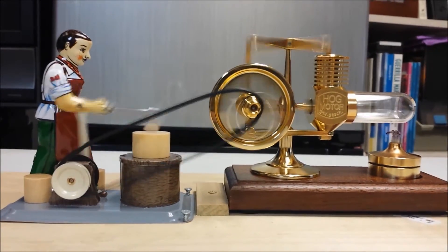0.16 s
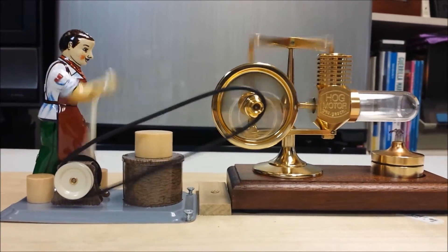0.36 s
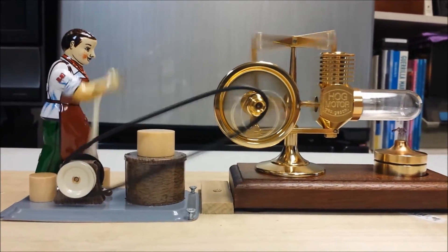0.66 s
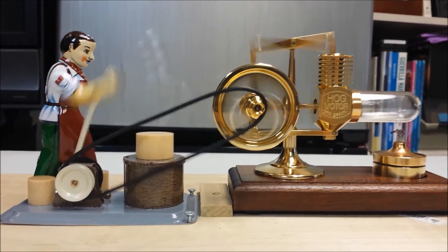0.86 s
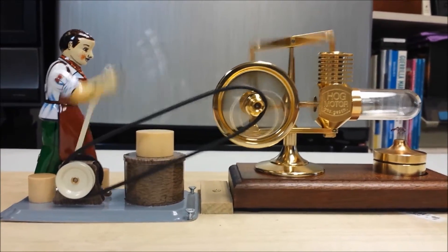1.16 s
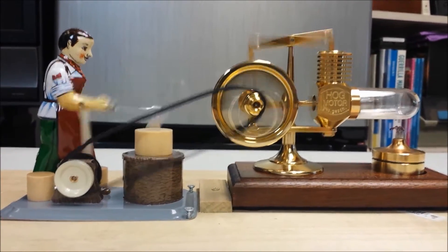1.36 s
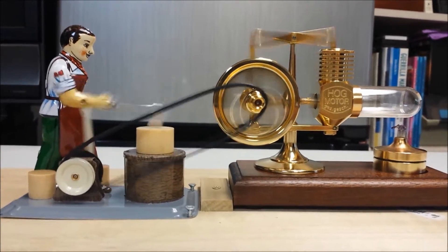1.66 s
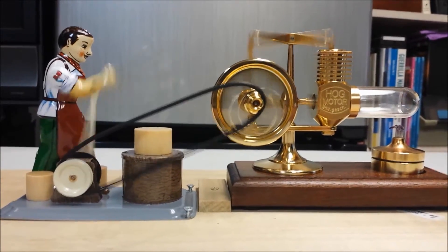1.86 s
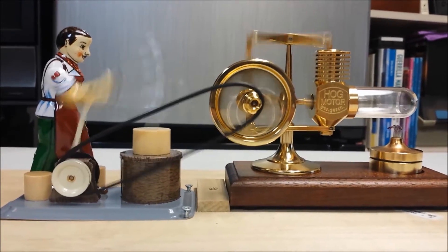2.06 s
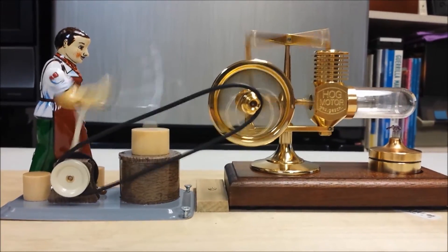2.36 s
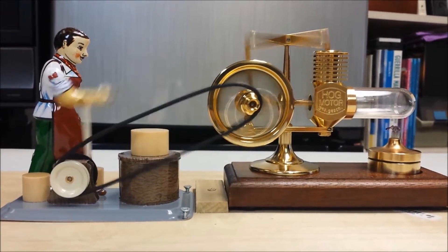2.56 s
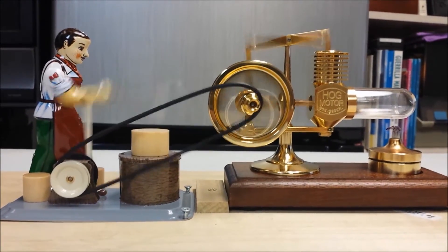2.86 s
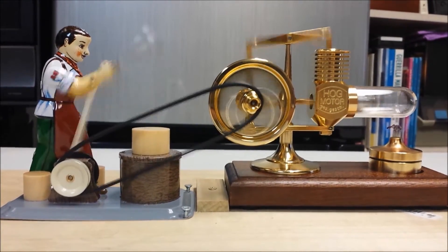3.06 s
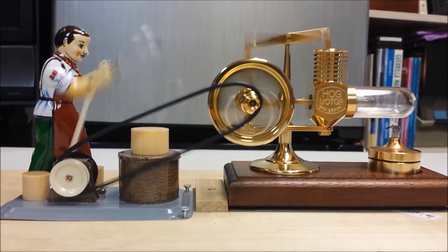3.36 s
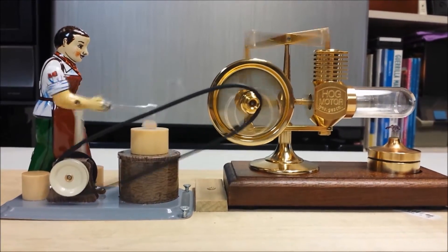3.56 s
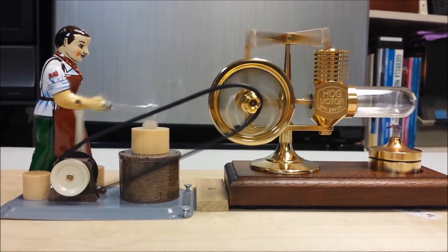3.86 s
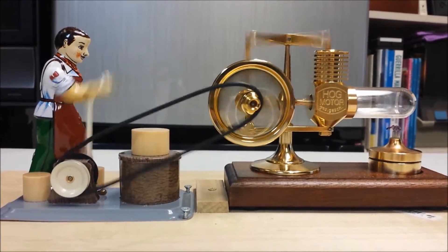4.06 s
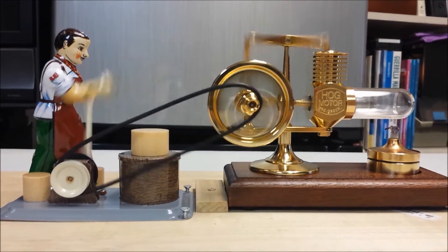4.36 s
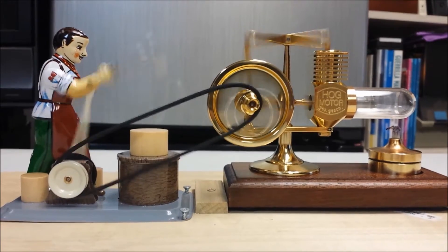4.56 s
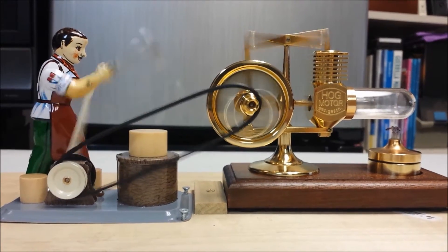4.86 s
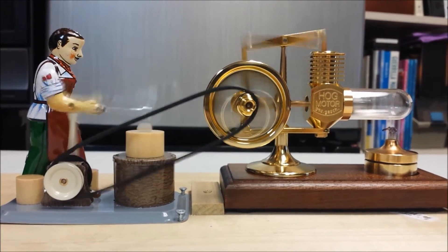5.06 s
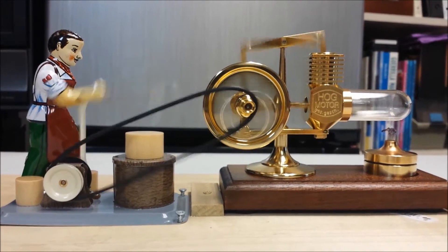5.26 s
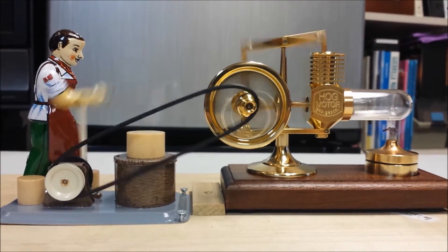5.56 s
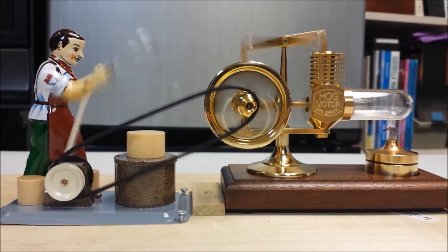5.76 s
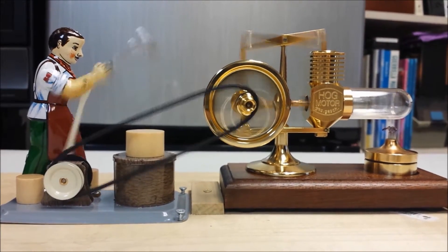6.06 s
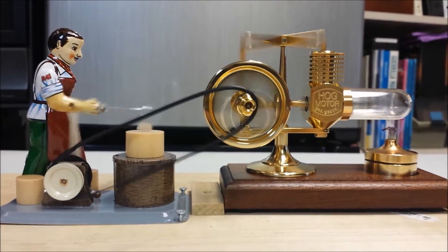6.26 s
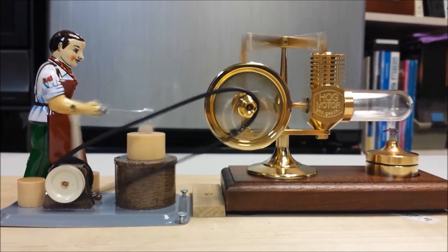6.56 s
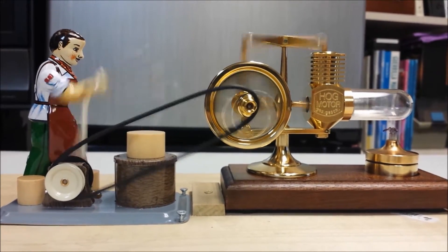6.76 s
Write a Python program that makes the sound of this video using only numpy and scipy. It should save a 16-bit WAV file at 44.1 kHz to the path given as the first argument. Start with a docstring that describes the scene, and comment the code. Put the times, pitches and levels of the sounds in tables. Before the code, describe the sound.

Steady, fast mechanical clacking, running from start to end without a pause. A tin linkage rattles and its edges squeak just before every blow; the axe cracks dryly on the block with a short hollow knock around 1 kHz, bounces once and chatters out. Behind it lies a quiet low engine rumble with fine rod ticks. Heard closely in stereo, the metal brighter on the right, with near echoes in a small room.

```python
"""A desk in a small room: a hot-air engine drives a tin toy woodcutter by a thin belt, close to two microphones.
Before each blow the toy's linkage rattles and its tin edges squeak, as clumped contacts through thin metal.
The axe knocks on the block (decaying sines) with a metallic crack (noise), bounces once and chatters to rest.
Behind it the engine hums through its base (shaft orders over rumbling noise) and its rods tick;
the room adds near echoes and a short diffuse tail."""
import sys
import numpy as np
from scipy import signal
from scipy.fft import rfft, irfft, next_fast_len
from scipy.io import wavfile
from scipy.ndimage import uniform_filter1d

SR = 44100
rng = np.random.default_rng(int(sys.argv[2]) if len(sys.argv) > 2 else 0)


def wrap_up_sound(samples):
    """Save the sound to the file named by the first command line argument, as 16-bit audio."""
    columns = np.atleast_2d(samples).T
    # keep every value between -1 and 1, then stretch to whole-number steps
    tamed = np.clip(columns, -1, 1)
    steps = np.round(tamed * 32767).astype(np.int16)
    wavfile.write(sys.argv[1], SR, steps)


N = 304819

# Axe strokes: (time [s], relative level of the blow [dB], relative level of the rattle before it [dB])
STROKES = [(0.1338, -18, -29), (0.2781, -17, -26), (0.4246, -17, -23.5), (0.5733, -17, -23),
           (0.7204, -16.5, -21.0), (0.8881, -17.5, -30.5), (1.0297, -17, -24.5), (1.1763, -16.5, -20.5),
           (1.3306, -17.5, -23), (1.4783, -17.0, -25.5), (1.6339, -17.5, -22), (1.777, -16, -21),
           (1.92, -17.5, -21.5), (2.0697, -15.5, -21), (2.2181, -18.0, -23.5), (2.3667, -20, -24.5),
           (2.5125, -18.5, -22.5), (2.6559, -17, -23), (2.803, -17, -26), (2.9507, -15.5, -24),
           (3.095, -15.5, -20.0), (3.247, -17.5, -19.5), (3.3933, -15, -22.5), (3.541, -17.0, -22),
           (3.6918, -17.5, -27), (3.8366, -17, -25.5), (3.994, -17.5, -23.5), (4.1406, -16.5, -25.5),
           (4.2879, -17.0, -21.5), (4.4374, -16, -23), (4.5845, -15.5, -21.5), (4.7644, -18, -22.5),
           (4.9115, -16, -26), (5.0541, -17.5, -22.5), (5.201, -17.5, -26), (5.3435, -17.0, -24),
           (5.513, -17.0, -27), (5.656, -17, -22.5), (5.8004, -18.5, -23.5), (5.9468, -18.0, -24.5),
           (6.0915, -17.5, -23.5), (6.253, -16.5, -32.5), (6.3928, -18.5, -23), (6.5376, -17.0, -23.5),
           (6.6898, -18.5, -24.5), (6.8371, -15.5, -22.5)]
# Modes of the block on its tin plate: (frequency [Hz], relative level [dB], t60 [s], rise constant [s])
BLOCK_MODES = [(292, -22, 0.13, 0.004), (358, -24, 0.14, 0.004), (490, -12, 0.11, 0.012),
               (510, -10.2, 0.18, 0.0119), (532, -26.1, 0.119, 0.0002), (815, -23, 0.127, 0.0013),
               (986, -14.8, 0.119, 0.012), (1028, 4.7, 0.044, 0.0012), (1013, -12.8, 0.182, 0.0057),
               (1077, -2.3, 0.052, 0.0008), (1185, -10.5, 0.06, 0.0008), (1255, -21.2, 0.085, 0.0007),
               (1382, 0.5, 0.016, 0.0033), (1892, -0.0, 0.01, 0.0007), (2110, -8, 0.03, 0.001),
               (2200, -17, 0.079, 0.0027)]
# Echoes of the knock from near surfaces: (delay [s], level against the knock [dB])
NEAR_ECHOES = [(0.00623, -14.8), (0.01111, -14.7), (0.02791, -24.5)]
# Single hard clicks: catches of loose tin parts, and at 3.131 s a bounce of the axe:
# (time [s], relative level [dB])
HARD_CLICKS = [(0.0907, -18), (0.5212, -13), (1.4277, -9.5), (1.5755, -8.5), (2.7517, -12.5), (3.131, -4),
               (3.486, -10), (3.7853, -20), (4.0901, -19), (5.468, -16)]
# Ringing of the thin metal: (frequency [Hz], width [Hz], height over the broad colour at ring 1 [dB])
TIN_RESONANCES = [(510, 30, 3), (1005, 60, 4), (1270, 80, 5), (1950, 60, 2), (2100, 40, 2), (2210, 50, 4),
                  (3460, 70, 2), (4545, 100, 4), (4880, 90, 6), (5680, 110, 3), (6070, 70, 8),
                  (6680, 45, 4), (7850, 90, 5.5), (8680, 70, 4), (10950, 120, 4), (12780, 110, 7)]
# Broad colour of the axe's crack, also of the gritty clicks: (frequency [Hz], relative level [dB])
CRACK_COLOUR = [(60, -32), (180, -11), (700, -18), (1500, -3.5), (2700, -5.5), (3800, 1.5), (6000, 1.5),
                (7300, 3), (9200, 3.5), (11500, -3.5), (13300, -7.5), (14400, -12), (15500, -27)]
# Broad colour of the swinging linkage: (frequency [Hz], relative level [dB])
RATTLE_COLOUR = [(60, -30), (130, -7), (380, 2), (520, 0), (700, -8), (900, -6.5), (1300, -2), (2000, 1.5),
                 (2900, -1), (4100, 4), (6000, 2), (9000, 1.5), (12000, -9), (15000, -16)]
# Broad colour of the chatter, the bounce and the engine ticks: (frequency [Hz], relative level [dB])
CLATTER_COLOUR = [(70, -17.5), (300, -6.5), (800, -4.5), (1400, 0.5), (2800, -1), (4800, 0), (7000, -1),
                  (10000, -6), (12500, -13), (15000, -29)]
# Broad colour of the engine's rumble: (frequency [Hz], relative level [dB])
RUMBLE_COLOUR = [(20, -23), (55, -15), (85, -10.5), (115, 3), (150, -6.5), (190, 3), (250, -15.5),
                 (290, -1), (335, -10), (365, 3), (420, -41), (520, -3.5), (750, -30), (2000, -50.5)]
# Speed of the engine shaft: (time [s], rate [turns/s])
SHAFT_SPEED = [(0, 20.3), (.75, 19), (1.25, 19.35), (1.748, 19.46), (3.252, 19.52), (5, 20), (6.902, 15.6)]
# Engine hum in the base: (shaft order [multiple of the turning rate], relative level [dB])
HUM_ORDERS = [(4, -65), (5, -65), (6, -66), (8, -60), (9, -53), (10, -57), (11, -65), (12, -53), (13, -65),
              (15, -64), (16, -64), (24, -66)]
# Decay of the room tail: (frequency [Hz], t60 [s])
ROOM_DECAY = [(150, 0.16), (1000, 0.15), (5000, 0.13), (14000, 0.14)]
# Colour difference of the microphones: (frequency [Hz], left minus right [dB])
MIC_BALANCE = [(60, -4), (110, -1), (200, 3.5), (380, 0.5), (700, -1.5), (2400, -0.5), (4400, -1),
               (6300, 0.5), (8100, -5.5), (11000, -8), (15000, -3)]
# Treble roll-off of the whole sound: (frequency [Hz], level [dB])
TREBLE_ROLLOFF = [(14500, 0), (15100, -15), (16400, -24)]

# The axe's bounce: time in the air and its scatter, scatter of strength, level at which it rings the block
BOUNCE_S, BOUNCE_VARY_S, BOUNCE_VARY_DB, BOUNCE_KNOCK_DB = 0.0272, 0.0011, 2.6, -22
# The swing's rattle starts ahead of the blow, swells, holds and dies away
SWING_LEAD_S, SWING_RISE_S, SWING_HOLD_S, SWING_FALL_DB_PER_S = 0.059, 0.0077, 0.02, 720
# No two swings are alike: scatter of the start and of the hold
SWING_START_VARY_S, SWING_HOLD_VARY_S = 0.0013, 0.0034
# A soft swell of rattle leads into each blow: lead, half-length, level against the blow
LEAD_IN_S, LEAD_IN_HALF_S, LEAD_IN_DB = 0.0021, 0.0019, -13
# The chatter after the blow dies at a steady pace; its strength scatters
CHATTER_FALL_DB_PER_S, CHATTER_VARY_DB = 284, 0.7
# Two weaker catches in each swing: lead before the blow and its scatter, level and its scatter
CATCH_LEAD_S, CATCH_VARY_S, CATCH_DB, CATCH_VARY_DB = 0.053, 0.011, -21, 2.5
# Pitch of every squeak and its scatter
SQUEAK_HZ, SQUEAK_VARY_OCTAVES = 9560, 0.23
BASS_EDGE_HZ = 103  # such small parts radiate little below this
EXTRA_PATH_S = 0.000185  # later arrival of the near sound at the left microphone
TOP_HZ = 16450  # band limit of the whole sound


def amp(db):
    """Decibels to amplitude gain."""
    return 10 ** (np.asarray(db) / 20)


def unit(x):
    """Scale x to rms 1."""
    return x / np.sqrt(np.mean(x ** 2) + 1e-20)


def along(points, hz):
    """Read (frequency [Hz], value) points on a log frequency axis."""
    f, value = np.transpose(points)
    return np.interp(np.log(hz + 1), np.log(f), value)


def filtered(x, response):
    """Multiply the spectrum of x by a response given as a function of frequency in Hz."""
    size = next_fast_len(N + SR // 2)
    hz = np.fft.rfftfreq(size, 1 / SR)
    return irfft(rfft(x, size) * response(hz), size)[..., :N]


def add(track, s, sound):
    """Mix a sound into the track at time s, cut at the track's end."""
    start = max(round(s * SR), 0)
    target = track[..., start:start + sound.shape[-1]]
    target += sound[..., :target.shape[-1]]


def spread(make, apart):
    """A left-right pair of rms 1: one shared signal plus a share of each side's own."""
    shared = make()
    own = np.array([make(), make()])
    return unit(shared + apart * own)


def contacts(rate, scatter_db, apart):
    """Dense tiny impacts of random sign and uneven size, on average rate a second in each part of the pair."""
    def impacts():
        struck = rng.random(N) < rate / SR
        sign = rng.choice([-1, 1], N)
        return struck * sign * amp(scatter_db * rng.standard_normal(N))
    return spread(impacts, apart)


def tin(x, colour, ring, size=8192):
    """Contacts heard through thin metal: a minimum-phase filter of energy 1 with its resonances."""
    hz = np.fft.rfftfreq(size, 1 / SR)
    peaks = sum((amp(db) ** 2 - 1) / (1 + (2 * (hz - f) / width) ** 2) for f, width, db in TIN_RESONANCES)
    magnitude = amp(along(colour, hz)) * np.sqrt(1 + np.abs(ring * peaks))
    # folding the cepstrum onto positive times makes the filter causal
    cepstrum = irfft(np.log(magnitude))
    cepstrum[1:size // 2] *= 2
    cepstrum[size // 2 + 1:] = 0
    answer = irfft(np.exp(rfft(cepstrum)))
    answer = answer / np.linalg.norm(answer)
    return signal.fftconvolve(x, answer[None], axes=1)[:, :N]


def second_landings():
    """Where each bounce of the axe ends, as (time [s], level [dB]), scattered in time and strength."""
    chance = rng.standard_normal((len(STROKES), 2))
    return [(s + BOUNCE_S + BOUNCE_VARY_S * late, blow_db + BOUNCE_VARY_DB * hard)
            for (s, blow_db, _), (late, hard) in zip(STROKES, chance)]


def knocks(landings, level_db, vary_db):
    """The axe rings the block's decaying modes, unevenly, and faintly again on the bounce; blows echo nearby."""
    out, t = np.zeros(N), np.arange(SR // 4) / SR
    hz, db, t60, rise = np.transpose(BLOCK_MODES)[:, :, None]
    for (s, blow_db, _), (landing_s, landing_db) in zip(STROKES, landings):
        strength = db + vary_db * rng.standard_normal(db.shape)
        envelope = amp(strength - 60 * t / t60) * (1 - np.exp(-t / rise))
        knock = (envelope * np.sin(2 * np.pi * hz * t)).sum(0)
        for delay, echo_db in [(0, 0), *NEAR_ECHOES]:
            add(out, s + delay, amp(blow_db + level_db + echo_db) * knock)
        add(out, landing_s, amp(landing_db + level_db + BOUNCE_KNOCK_DB) * knock)
    return np.array([out, out])


def cracks(level_db, t60, fresh, apart, ring, linger):
    """Metal meets the block: brief bursts of scattered contacts, partly alike from blow to blow."""
    out, t = np.zeros((2, N)), np.arange(SR // 25) / SR

    def scatter():
        return spread(lambda: rng.uniform(-0.87, 1, len(t)), apart)

    usual = scatter() * amp(-60 * t / 0.025)  # the shared part has its own 25 ms decay
    for s, blow_db, _ in STROKES:
        # the axe grinds on the block for a moment before the sound dies
        grind_s = linger * rng.uniform(0.14, 1.0)
        fade_db = -60 * np.maximum(t - grind_s, 0) / t60
        mix = (usual + fresh * scatter()) / np.hypot(1, fresh)
        add(out, s, amp(blow_db + level_db) * mix * amp(fade_db))
    return tin(out, CRACK_COLOUR, ring)


def bounces(landings, level_db, t60, ring):
    """The second landing of the axe is a short dry click of decaying noise through tin."""
    out, t = np.zeros((2, N)), np.arange(SR // 60) / SR
    for s, db in landings:
        grit = spread(lambda: rng.uniform(-1.05, 1, len(t)), apart=0.67)
        add(out, s, amp(db + level_db - 60 * t / t60) * grit)
    return tin(out, CLATTER_COLOUR, ring)


def linkage(swing_db, settle_db, lumpy_db, ring):
    """The loose arm rattles as it is swung, swells softly into the blow, and chatters after it."""
    swing, settle, t = np.zeros(N), np.zeros(N), np.arange(SR // 10) / SR
    swell = np.minimum(t / SWING_RISE_S, 1) ** 2
    lead_in = np.exp(-(t / LEAD_IN_HALF_S - 2) ** 2)
    chance = rng.standard_normal((len(STROKES), 3))
    for (s, blow_db, rattle_db), (late, longer, harder) in zip(STROKES, chance):
        hold_end = SWING_RISE_S + SWING_HOLD_S + SWING_HOLD_VARY_S * longer
        fall_db = SWING_FALL_DB_PER_S * np.maximum(t - hold_end, 0)
        swing_start = s - SWING_LEAD_S + SWING_START_VARY_S * late
        add(swing, swing_start, swell * amp(rattle_db + swing_db - fall_db))
        add(swing, s - LEAD_IN_S - 2 * LEAD_IN_HALF_S, amp(blow_db + LEAD_IN_DB) * lead_in)
        chatter_db = blow_db + settle_db + CHATTER_VARY_DB * harder
        add(settle, s, amp(chatter_db - CHATTER_FALL_DB_PER_S * t))
    # the impacts come in clumps of a few milliseconds
    lumps = unit(uniform_filter1d(rng.standard_normal(N), size=170))
    clumps = unit(amp(lumpy_db * lumps))
    swing_hits = swing * clumps * contacts(rate=7000, scatter_db=5.0, apart=0.94)
    rattle = tin(swing_hits, RATTLE_COLOUR, ring)
    settle_hits = settle * clumps * contacts(rate=6000, scatter_db=1.5, apart=1.0)
    return rattle + tin(settle_hits, CLATTER_COLOUR, ring)


def squeaks_and_clicks(level_db, width, body_db, t60, ring):
    """Catching tin edges, and one hard bounce: a tiny bright windowed sine and a gritty noise click through tin."""
    squeaks, clicks = np.zeros(N), np.zeros(N)
    t = np.arange(SR // 80) / SR
    chance = rng.standard_normal((len(STROKES), 2, 2))
    weak = [(s - CATCH_LEAD_S + CATCH_VARY_S * late, CATCH_DB + CATCH_VARY_DB * hard)
            for (s, *_), draws in zip(STROKES, chance) for late, hard in draws]
    for s, db in [*HARD_CLICKS, *weak]:
        hz = SQUEAK_HZ * 2 ** (SQUEAK_VARY_OCTAVES * rng.standard_normal())
        window = np.exp(-(t / width - 4) ** 2)
        add(squeaks, s, amp(db + level_db) * window * np.sin(2 * np.pi * hz * t))
        add(clicks, s, amp(db + body_db - 60 * t / t60) * rng.standard_normal(len(t)))
    return squeaks + tin(clicks[None], CRACK_COLOUR, ring)


def recoloured(x, patchy_db):
    """Each contact meets the tin at another spot, so its colour shifts a little from moment to moment."""
    z = signal.stft(x, nperseg=256)[2]
    field = rng.standard_normal(z.shape[1:])
    field = uniform_filter1d(field, size=14, axis=0)  # smooth over frequency
    field = uniform_filter1d(field, size=6, axis=1)  # smooth over time
    gain = unit(amp(patchy_db * unit(field)))
    return signal.istft(z * gain, nperseg=256)[1][:, :N]


def engine(hum_db, rumble_db, tick_db, throb_db, ring):
    """Shaft orders hum in the base over steady rumble; the rods tick hardest at both ends of each stroke."""
    turns = np.cumsum(np.interp(np.arange(N) / SR, *np.transpose(SHAFT_SPEED))) / SR
    hum = sum(amp(db + hum_db) * np.sqrt(2) * np.sin(2 * np.pi * (order * turns + rng.random()))
              for order, db in HUM_ORDERS)
    reversal = unit(amp(throb_db * np.cos(2 * np.pi * turns) ** 20))  # two peaks a turn
    noise = spread(lambda: rng.standard_normal(N), apart=0.65)
    rumble = unit(filtered(noise, lambda hz: amp(along(RUMBLE_COLOUR, hz))))
    rod_hits = reversal * contacts(rate=9000, scatter_db=2.0, apart=1.0)
    ticks = tin(rod_hits, CLATTER_COLOUR, ring)
    return hum + amp(rumble_db) * rumble, amp(tick_db) * ticks


def room(x, delay):
    """A short diffuse tail of noise decaying by frequency, different at each side, after a delay in s."""
    hz, t, z = signal.stft(rng.standard_normal((2, SR // 3)), SR, nperseg=256)
    decay = amp(-60 * t / along(ROOM_DECAY, hz)[:, None])
    tail = signal.istft(z * decay, SR, nperseg=256)[1]
    tail = np.pad(tail / np.linalg.norm(tail[0]), ((0, 0), (round(abs(delay) * SR), 0)))
    return signal.fftconvolve(x, tail, axes=1)[:, :N]


def scene():
    """Toy and engine in the room; toy and ticks reach the right microphone first."""
    landings = second_landings()
    block = knocks(landings, level_db=2.5, vary_db=1.76)
    metal = cracks(level_db=3.5, t60=0.031, fresh=0.96, apart=0.72, ring=0.99, linger=0.0033)
    metal = metal + linkage(swing_db=1.0, settle_db=-4.5, lumpy_db=2.0, ring=1.73)
    metal = metal + squeaks_and_clicks(level_db=0.0, width=0.00023, body_db=-12.5, t60=0.025, ring=1.0)
    metal = metal + bounces(landings, level_db=-4.5, t60=0.02, ring=1.0)
    metal = recoloured(metal, patchy_db=1.5)
    drone, ticks = engine(hum_db=0.5, rumble_db=-43.0, tick_db=-38, throb_db=10.5, ring=0.37)
    near = filtered(block + metal + ticks, lambda hz: (1j * hz / (1j * hz + BASS_EDGE_HZ)) ** 2)
    left = filtered(near[0], lambda hz: np.exp(-2j * np.pi * hz * EXTRA_PATH_S))
    near = np.array([left, near[1]])
    metal_tail = amp(-8.5) * room(metal, delay=0.004)
    block_tail = amp(-24) * room(block, delay=0.012)
    return near + drone + metal_tail + block_tail


def record(dry):
    """The two microphones differ in colour; the highest peaks are rounded, nothing is kept above the band limit."""
    half_each = np.array([[0.5], [-0.5]])  # left, right
    x = filtered(dry, lambda hz: amp(along(TREBLE_ROLLOFF, hz) + along(MIC_BALANCE, hz) * half_each))
    x = x / (1 + np.abs(x / 0.86) ** 8) ** (1 / 8)
    return filtered(x, lambda hz: hz < TOP_HZ)


dry = scene()
out = record(dry)
wrap_up_sound(out)
```